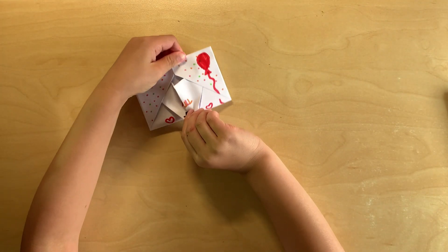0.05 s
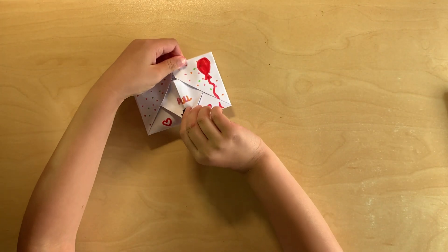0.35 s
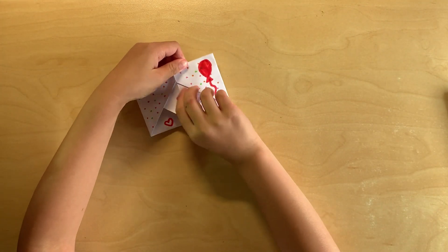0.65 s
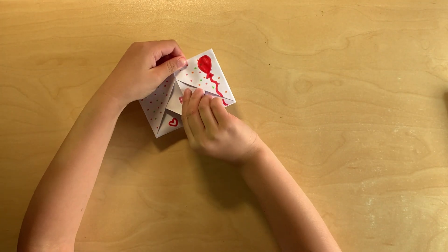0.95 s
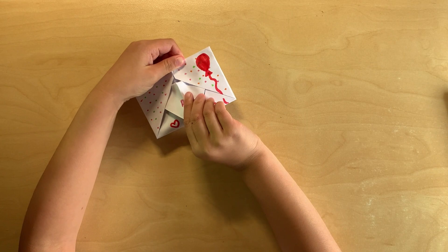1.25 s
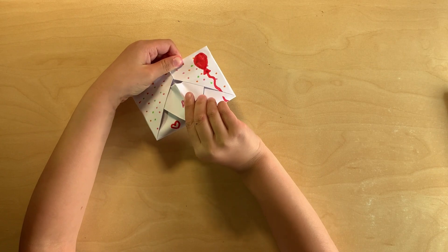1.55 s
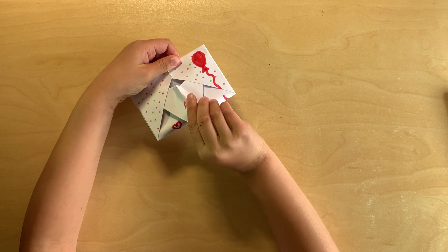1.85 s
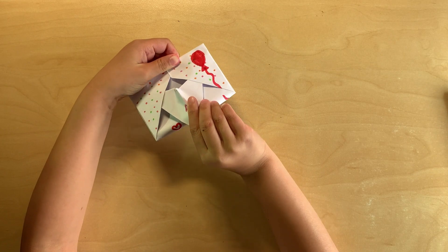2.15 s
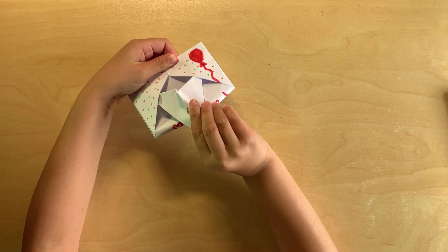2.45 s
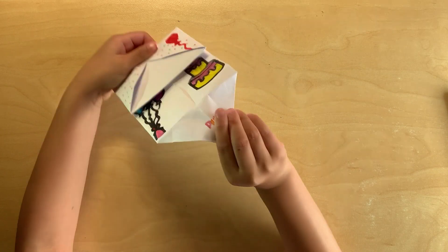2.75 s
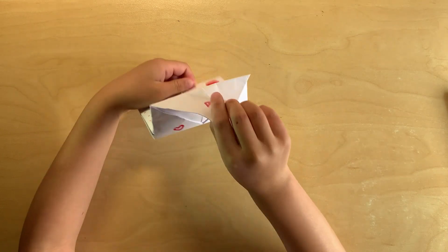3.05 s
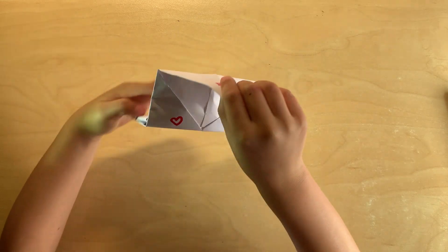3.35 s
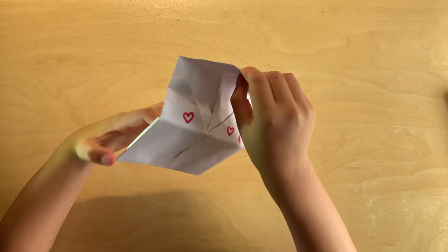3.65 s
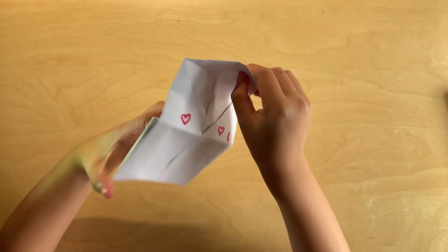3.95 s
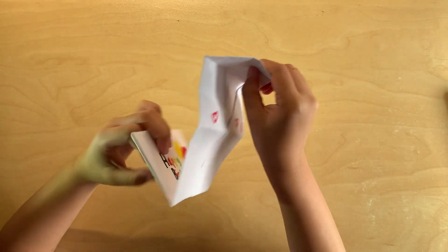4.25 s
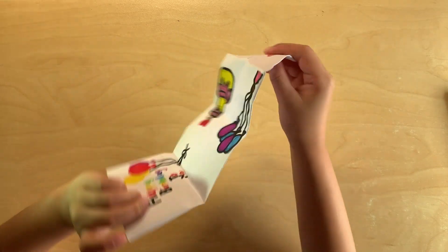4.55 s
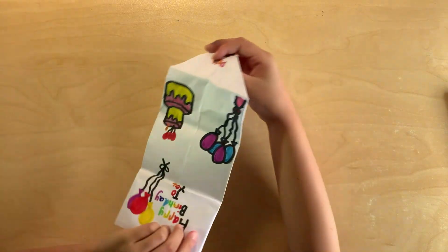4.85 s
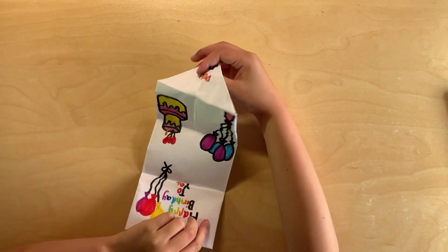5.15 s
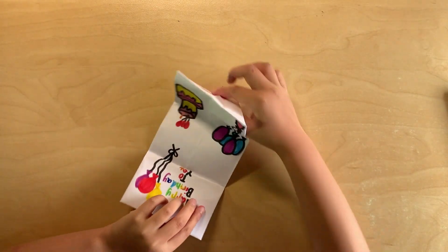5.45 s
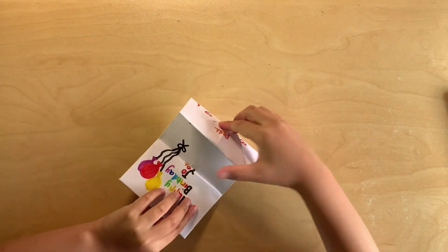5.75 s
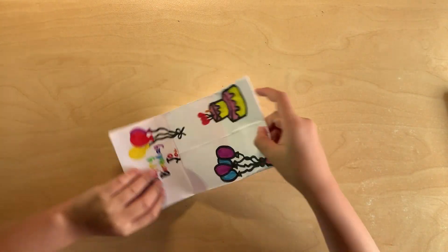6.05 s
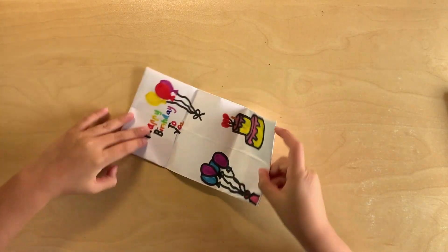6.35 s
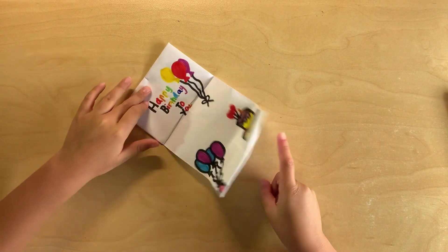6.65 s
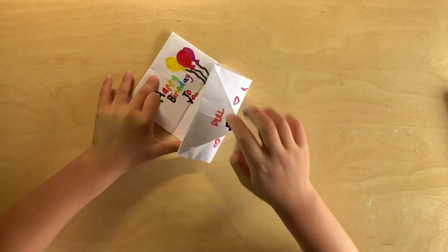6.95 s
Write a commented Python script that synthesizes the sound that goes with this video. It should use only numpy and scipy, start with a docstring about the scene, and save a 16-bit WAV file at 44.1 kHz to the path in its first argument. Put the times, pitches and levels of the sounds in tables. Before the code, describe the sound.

A folded paper card is handled over a wooden table in a small quiet room, heard in stereo. From the start, short pulls make dry scrapes of paper on paper, with crisp crease snaps, the sharpest around 1.3 and 1.7 seconds. The rubbing builds until, at about 2.7 seconds, the fold pops open with a crack and a low thump, the loudest moment. From 3 to 4.8 seconds the card is lifted and shaken out, giving quieter rustles, scattered ticks, soft low bumps and a barely audible hollow tone. From about 4.9 seconds it is laid down, dragged across the table and folded back, with clearer snaps near 5.6 and 6.2 seconds and a soft bump around 6.6. The rustling thins out just after 7 seconds. Faint room rumble and hiss lie underneath, with a weak drone that fades after about 2 seconds.

```python
"""Two hands draw a folded paper card open over a wooden table, in a small quiet room with a fading drone.
Paper slides on paper in tiny slips while creases snap and ring their panels. Near 2.7 s the whole fold
pops open with a thump. The card is lifted, with a faint hollow tone, and shaken out; from about 4.9 s it
is laid down, dragged over the table and folded back. Two closely spaced microphone ports hear it all."""
import sys
import numpy as np
from scipy import signal
from scipy.fft import rfft, irfft, next_fast_len
from scipy.io import wavfile
from scipy.ndimage import uniform_filter1d

SR = 44100
rng = np.random.default_rng(int(sys.argv[2]) if len(sys.argv) > 2 else 0)


def transcribe(signal):
    """Save signal, clipped to [-1, 1], as a 16-bit WAV file at the path in sys.argv[1]."""
    frames = np.atleast_2d(signal).T
    limited = np.clip(frames, -1, 1)
    pcm = np.round(limited * 32767).astype(np.int16)
    wavfile.write(sys.argv[1], SR, pcm)


N = 317961
TIME = np.arange(N) / SR

# The bright colour of a cracking crease. Each row: frequency in Hz, gain in dB.
CRACK_COLOUR = [(2500, -30.5), (5000, -18.5), (7000, 0.5), (9000, 5), (12000, -1), (15500, -4)]


def undb(db):
    """Decibels to gain."""
    return 10 ** (np.asarray(db) / 20)


def unit(x):
    """Scale to an rms of one."""
    return x / np.sqrt(np.mean(x ** 2))


def gains(points, hz):
    """Gain of a (Hz, dB) colour at the given frequencies."""
    point_hz, db = np.transpose(points)
    return undb(np.interp(np.log(hz + 1), np.log(point_hz), db))


def colour(x, points):
    """Causal EQ with a (Hz, dB) colour, built from the cepstrum."""
    size = 2 * next_fast_len(x.shape[-1] // 2 + 2048)
    cepstrum = irfft(np.log(gains(points, np.fft.rfftfreq(size, 1 / SR))))
    cepstrum[1:size // 2] *= 2
    cepstrum[size // 2 + 1:] = 0
    return irfft(rfft(x, size) * np.exp(rfft(cepstrum)))[..., :x.shape[-1]]


def bell(hz, octaves):
    """Colour of one resonance whose energy is centred on hz."""
    offset = np.linspace(-5, 5, 41)
    db = np.maximum(-2.2 * (offset / octaves) ** 2 - 3 * offset, -50)
    return np.column_stack([hz * 2 ** offset, db])


def add(out, start, sound):
    """Mix a sound in at a start time in seconds."""
    i = int(start * SR)
    out[i:i + len(sound)] += sound[:N - i]


def drift(rate):
    """Random wander with an rms of one, turning rate times a second."""
    span = int(SR / rate)
    steps = np.repeat(rng.standard_normal(N // span + 1), span)
    return unit(uniform_filter1d(steps, span)[:N])


def room_tone(air_db=-72.5, drone_db=-76.5):
    """A nearly centred rumble under a wide hiss, and a faint drone that sags and fades out."""
    # The colour of the quiet room. Each row: frequency in Hz, gain in dB.
    air_colour = [(20, -16), (40, 15.5), (62, 15.5), (120, 12.5), (180, 6), (300, 1), (600, -4),
                  (1100, -10), (2400, -13.5), (5000, -9), (9000, -27), (15000, -17.5)]
    mid, side = colour(rng.standard_normal((2, N)), air_colour)
    side = colour(side, [(150, -11), (600, -5), (2000, 0)])
    air = (mid + side * np.array([[1], [-1]])) / np.std(mid) * undb(air_db)
    drone_colour = [(150, -31), (330, -8), (370, 2.5), (410, -14), (800, -47)]
    drone = unit(colour(rng.standard_normal(N), drone_colour))
    fade_db = 2.5 * TIME + 36 * np.maximum(TIME - 1.7, 0)
    return air + drone * undb(drone_db - fade_db)


def rubbing(t, rise_db=16.5, sag_db_per_s=13.5, release_db_per_s=323, hiss_release_db_per_s=209.5):
    """The hands' strokes summed at times t: level in dB, rasp centre in Hz, relative body and hiss dB."""
    # Strokes of paper over paper: short pulls on the tab, the fold giving way at 2.6 s, lifting and
    # shaking from 3 s, dragging and folding from 4.9 s. Each row: start, attack and hold in seconds,
    # level in dB, rasp centre in Hz, panel body and fibre hiss in dB relative to the level.
    strokes = [ (0, 0.001, 0.012, -44, 3620, -17.5, 7.5), (0.058, 0.025, 0.0073, -50, 2500, -9.5, -1.5),
               (0.302, .016, 0.013, -44.5, 3340, -24, 0), (0.331, 0.022, .045, -48, 2220, -25, -2.5),
               (0.421, 0.049, 0.19, -60, 2730, -14, -8.5), (0.834, 0.0056, 0.012, -62.5, 2000, -2, -18),
               (0.903, 0.02, 0.17, -64.5, 2120, -11, -13), (1.026, .1, .015, -52.5, 2400, -18, -6),
               (1.204, 0.094, 0.022, -52, 2630, -12.5, -8.5), (1.338, 0.03, 0.052, -54, 3280, -11, -4),
               (1.427, .01, 0.058, -65.5, 3230, -21, 1.5), (1.655, 0.026, 0.035, -53, 4400, -17, 0),
               (1.768, 0.027, 0.021, -48.5, 2530, -7.5, -10), (1.847, 0.024, .21, -58, 2250, -3.5, -18),
               (2.124, 0.004, 0.025, -55, 2540, -4.5, -11), (2.222, 0.0045, 0.031, -52, 2340, -6, -4.5),
               (2.323, 0.0078, 0.035, -48, 2560, -8, -2), (2.418, 0.006, .025, -51, 2900, -7.5, 0.5),
               (2.439, .032, 0.044, -46, 2630, -12, -4), (2.588, 0.018, .035, -47, 2550, -17, -10),
               (2.619, 0.043, 0.019, -40.5, 3180, -12.5, 1), (2.66, 0.0061, 0.0053, -28.5, 3060, -6, -4),
               (2.688, 0.0092, 0.074, -46, 2300, -4, -7.5), (3.029, 0.021, 0.013, -71.5, 3240, -15, -2),
               (3.215, 0.12, .015, -69, 5000, -23.5, 1.5), (3.516, 0.019, 0.093, -72, 5000, -16, 10.5),
               (3.758, 0.0074, .015, -56.5, 4100, -17, -3.5), (3.782, 0.017, 0.022, -53, 3480, -10.5, -4),
               (3.938, 0.014, 0.015, -63.5, 4400, -4, 2), (3.986, .025, .008, -56, 3470, -17, -12),
               (4.063, .012, .008, -65.5, 2600, -4, -5.5), (4.163, .007, 0.012, -57.5, 2120, -4.5, -15),
               (4.187, .025, 0.055, -67.5, 2690, 2, 0), (4.24, 0.025, .005, -66.5, 4230, -1, 5),
               (4.281, 0.036, 0.019, -72, 3940, -5.5, 8.5), (4.408, 0.071, 0.047, -65.5, 3610, -8, 0.5),
               (4.59, .008, .004, -84, 3540, -3, 11.5), (4.67, 0.013, 0.018, -59, 1730, -4, -27),
               (4.87, 0.018, .016, -59.5, 2630, 2.5, 1.5), (4.923, 0.019, .13, -68, 1420, -3, -14.5),
               (5.119, 0.034, 0.096, -65.5, 2105, -5, -8), (5.257, 0.019, 0.065, -55.5, 2120, -7, -7.5),
               (5.37, 0.13, 0.049, -56, 3320, -11.5, 0.5), (5.578, 0.015, 0.018, -53.5, 2210, -10.5, -17),
               (5.805, 0.014, .025, -60.5, 3830, -13.5, 5), (5.838, 0.067, 0.18, -68, 2500, -1.5, -1),
               (5.943, 0.012, 0.0093, -59, 4420, -24, 9), (6.11, 0.014, 0.058, -64, 2500, -8, -7),
               (6.19, 0.018, 0.011, -45.5, 2840, -12.5, -1.5), (6.263, 0.04, 0.0079, -49, 4370, -20, 6.5),
               (6.309, 0.0083, 0.029, -47.5, 2900, -10, 0.5), (6.368, .02, 0.13, -60, 3400, -22, -1),
               (6.51, 0.031, 0.065, -53.5, 3900, -18, 0), (6.755, 0.023, 0.064, -56, 3200, -10.5, -0.5),
               (6.847, 0.045, 0.17, -66, 3400, -20, -6.5), (7.143, 0.059, .01, -67.5, 3600, -19, -4)]
    # The fingers never hold the paper quite still.
    grip_db, grip_hz, grip_body_db, grip_hiss_db = -88, 2760, -6, 1.5
    start, attack, hold, db, hz, body_db, hiss_db = np.transpose(strokes)[:, :, None]
    age = t - start
    rise = np.minimum(age / attack - 1, 0)
    past_peak = np.maximum(age - attack, 0)
    released = np.maximum(age - attack - hold, 0)
    envelope_db = -rise_db * rise ** 2 - sag_db_per_s * past_peak - release_db_per_s * released
    power = undb(np.maximum(db + envelope_db, -200)) ** 2
    grip = undb(grip_db) ** 2
    total = power.sum(axis=0) + grip
    blend = lambda value, at_rest: ((power * value).sum(axis=0) + grip * at_rest) / total
    hiss_power = undb(hiss_db - hiss_release_db_per_s * released) ** 2  # stops sooner than the rasp
    body_share = blend(undb(body_db) ** 2, undb(grip_body_db) ** 2)
    hiss_share = blend(hiss_power, undb(grip_hiss_db) ** 2)
    return 10 * np.log10(total), blend(hz, grip_hz), 10 * np.log10(body_share), 10 * np.log10(hiss_share)


def slips(per_second, spread_db, smooth):
    """Fibres catch and let go: dense clicks of uneven size over a smooth rub."""
    size = undb(spread_db * np.minimum(rng.exponential(size=N), 3.5))
    clicks = (rng.random(N) < per_second / SR) * size * rng.standard_normal(N)
    return unit(unit(clicks) + smooth * rng.standard_normal(N))


def sliding(body_trim_db=-1, rasp_trim_db=-1, flutter_db=1.5, rasp_octaves=0.76, bend_db=3.0):
    """Slips shake the panels, rasp in the sheet and hiss at its surface; bands waver as it bends."""
    # The colours of the rubbed panels and of the surface hiss. Each row: frequency in Hz, gain in dB.
    body_colour = [(120, -30), (300, -12.5), (500, -5), (800, 2.5), (1100, 3.5), (1500, -10), (2400, -35.5)]
    hiss_colour = [(4500, -82.5), (6300, -3.5), (7500, 11.5), (9000, -6.5), (12000, 5), (15500, -2)]
    step, size = 32, next_fast_len(N)
    level_db, centre_hz, body_db, hiss_db = rubbing(TIME[::step])
    friction = slips(per_second=5000, spread_db=-0.5, smooth=0.76) * undb(flutter_db * drift(90))
    spectrum = rfft(friction, size)
    hz = np.fft.rfftfreq(size, 1 / SR)
    bands = 160 * 2 ** (np.arange(21)[:, None] / 3)  # third octaves, in Hz
    share = lambda power: power / power.sum(axis=0)
    rasp = np.exp(-.5 * (np.log2(bands / centre_hz) / rasp_octaves) ** 2)
    rasp /= 1 + (1150 / bands) ** 8 + (bands / 7000) ** 8  # steep low and high cuts
    power = share(rasp) * undb(rasp_trim_db) ** 2
    for tone, db in ((body_colour, body_db + body_trim_db), (hiss_colour, hiss_db)):
        power += share(gains(tone, bands) ** 2 * bands) * undb(db) ** 2
    out = np.zeros(N)
    for band, band_power in zip(bands, power):
        window = np.clip(1 - 3 * np.abs(np.log2((hz + 1) / band)), 0, 1)
        band_noise = unit(irfft(spectrum * window, size)[:N])
        gain = np.sqrt(band_power) * undb(level_db + bend_db * drift(11)[::step])
        out += band_noise * np.interp(TIME, TIME[::step], gain)
    return out


def buckle(tone, click_s, ring_s, tail_db):
    """A sudden kick, then bending waves die away in the sheet; has the energy of 1 ms at full level."""
    t = TIME[:2048]
    kick = unit(np.exp(-t / click_s) * rng.standard_normal(len(t)))
    waves = unit(np.exp(-t / ring_s) * rng.standard_normal(len(t)))
    sound = unit(colour(kick, tone)) + undb(tail_db) * unit(colour(waves, tone))
    return sound * np.sqrt(SR / 1000 / np.sum(sound ** 2))


def snapping(ring_trim_db=1, crack_trim_db=1.5, thud_trim_db=-2):
    """Each snap rings a panel at its own pitch; the crease adds a crack, the fold a hollow thud."""
    # Creases snapping and panels buckling. Each row: start in seconds, ring level in dB, panel pitch
    # in Hz, ring width in octaves, crack level in dB, thud level in dB (levels before the trims).
    snaps = [(0.379, -36, 2330, 1.18, -38, -48), (0.5302, -41.5, 4150, 0.97, -50, -75),
             (0.583, -44, 2420, 1.5, -63, -63), (0.6997, -50, 4480, 1.8, -54, -67),
             (0.8445, -41.5, 990, 0.43, -63, -45), (0.9227, -54, 1070, 1.5, -75, -46.5),
             (1.0462, -41.5, 1950, .7, -71, -61), (1.1245, -36, 2000, 0.47, -44.5, -69),
             (1.2963, -24.5, 3550, 0.63, -27.5, -50), (1.3638, -34, 4130, .6, -29, -64),
             (1.3796, -30.5, 3220, 0.64, -34.5, -63), (1.4355, -40, 3910, 1.15, -35.5, -62),
             (1.4717, -50, 4810, .4, -42, -71), (1.6715, -22.5, 5060, 0.59, -21, -80),
             (1.826, -28, 1680, 0.79, -66, -53), (2.127, -47.5, 2600, 0.84, -48, -60),
             (2.2217, -39, 2180, 0.78, -41, -61), (2.322, -36.5, 2100, 0.68, -52, -75),
             (2.5962, -36.5, 2730, 0.8, -47, -68), (2.6689, -16, 2900, 1.77, -35, -25.5),
             (2.6717, -20, 3900, 0.35, -20, -36), (2.6765, -19, 1900, 1.3, -22, -37),
             (2.7312, -29, 1750, 1.5, -26.5, -46), (2.7683, -37, 1600, 0.21, -56, -53),
             (2.792, -32, 1790, 0.57, -69, -55), (2.8802, -43.5, 1290, 0.45, -80, -51),
             (3.431, -53, 1450, 0.43, -66, -56), (3.8281, -44, 1640, 0.82, -74, -40.5),
             (3.8646, -46, 1880, 0.36, -79, -51), (4.0081, -39.5, 2210, 4.8, -43.5, -40.5),
             (4.1736, -43.5, 1640, 0.83, -63, -41.5), (4.254, -44, 2410, 5.4, -51, -56),
             (4.508, -43.5, 2195, 1.47, -50, -44), (4.5251, -47.5, 2010, 2, -66, -42.5),
             (4.6492, -61, 705, 1.5, -60, -41), (4.6783, -32, 796, 0.34, -80, -43.5),
             (4.696, -52, 1250, 0.87, -57, -61), (4.749, -51, 795, .3, -70, -42.5),
             (4.8831, -41.5, 2010, 1.4, -39.5, -56), (4.9948, -42.5, 1465, 0.32, -54.5, -61.5),
             (5.2958, -43, 1400, 0.21, -55, -68), (5.444, -45.5, 2430, 1.4, -59, -48.5),
             (5.5938, -28.5, 1930, 0.63, -59, -59.5), (5.924, -45.5, 1770, 0.86, -56, -59),
             (5.9927, -39, 1500, 0.49, -59, -48), (6.181, -29, 1520, 0.59, -35.5, -42.5),
             (6.215, -35, 2170, 1.54, -53, -58), (6.3185, -31, 3500, 0.25, -48, -54),
             (6.4466, -44, 2550, .25, -53, -72), (6.5465, -44, 2500, 0.16, -43, -56.5),
             (6.7773, -47, 1620, 1.4, -69, -63), (7.0818, -49.5, 1327, 0.47, -64, -66)]
    thud_colour = bell(hz=537, octaves=.55)
    out = np.zeros(N)
    for start, ring_db, hz, octaves, crack_db, thud_db in snaps:
        # A slack panel rings broadly and flutters on; a taut one gives a single narrow tick.
        slack_db = 4.5 * np.log2(octaves / 0.6)
        ring = buckle(bell(hz, octaves), click_s=0.00021, ring_s=0.0066, tail_db=slack_db)
        crack = buckle(CRACK_COLOUR, click_s=0.00068, ring_s=0.0028, tail_db=slack_db)
        thud = buckle(thud_colour, click_s=0.00008, ring_s=0.0065, tail_db=slack_db - 2)
        add(out, start, undb(ring_db + ring_trim_db) * ring)
        add(out, start, undb(crack_db + crack_trim_db) * crack)
        add(out, start, undb(thud_db + thud_trim_db) * thud)
    return out


def crinkling(count=90, over_db=5, crack_db=-7, spread_db=6, follow=0.92, pivot_db=-60):
    """Tiny buckles and cracks at random moments, stronger the harder the paper is rubbed."""
    out = np.zeros(N)
    starts = rng.random(count) * TIME[-1]
    level_db, centre_hz, _, _ = rubbing(starts)
    for start, db, hz, (size, detune) in zip(starts, level_db, centre_hz, rng.standard_normal((count, 2))):
        gain = undb(pivot_db + follow * (db - pivot_db) + over_db + spread_db * size)
        panel_colour = bell(hz * 2 ** (.55 * detune), octaves=.7)
        ring = buckle(panel_colour, click_s=0.00022, ring_s=0.005, tail_db=0.5)
        crack = buckle(CRACK_COLOUR, click_s=0.0005, ring_s=0.0035, tail_db=0.5)
        add(out, start, gain * (ring + undb(crack_db) * crack))
    return out


def thumping(trim_db=-1, rough=0.31, swell_cycles=1.15):
    """Sheet and hands push softly on air and table; each blow swells and dies in a few uneven cycles."""
    # The soft blows. Each row: start in seconds, peak level in dB before the trim, pitch in Hz.
    thumps = [(1.202, -57, 60), (2.671, -31.5, 208), (2.674, -33.5, 89.3), (2.704, -27, 117.8),
              (2.723, -36, 68.4), (2.744, -35, 123), (2.804, -45.5, 47), (2.909, -41.5, 101),
              (2.995, -53, 79.8), (3.433, -54, 125), (3.844, -49, 47.8), (3.898, -51, 51), (3.99, -50, 115),
              (4.044, -51, 70), (4.178, -53.5, 156), (4.313, -53.5, 73), (4.544, -56, 117),
              (6.233, -51.5, 117), (6.321, -53.5, 199), (6.632, -42, 109), (6.698, -54.5, 86),
              (6.78, -48, 144.6), (7.087, -55.5, 123)]
    out, t = np.zeros(N), TIME[:16384]
    for start, db, hz in thumps:
        swell_s = swell_cycles / hz
        envelope = t / swell_s * np.exp(1 - t / swell_s)
        rumble_colour = [(hz / 2, -6), (hz, 0), (2 * hz, -6), (10 * hz, -60)]
        rumble = unit(colour(rng.standard_normal(len(t)), rumble_colour))
        add(out, start, undb(db + trim_db) * envelope * (np.sin(2 * np.pi * hz * t) + rough * rumble))
    return out


def hollow_tone(width_hz=70):
    """A narrow, unsteady resonance swells and fades while the card is lifted."""
    # The faint swells. Each row: start in seconds, length in seconds, level in dB, pitch in Hz.
    swells = [(2.976, 0.25, -75.5, 764), (3.46, 0.35, -77, 743)]
    out = np.zeros(N)
    for start, length, db, hz in swells:
        t = TIME[:int(length * SR)]
        resonance = signal.iirpeak(hz, hz / width_hz, fs=SR)
        narrow_noise = signal.lfilter(*resonance, rng.standard_normal(SR))
        ring = signal.lfilter(*resonance, narrow_noise)[:len(t)]
        add(out, start, undb(db) * unit(ring) * np.sin(np.pi * t / length))
    return out


def room(x, early_s=.006, t60_low=.33, t60_high=.22, trim_db=-3):
    """Direct sound at two ports, quick echoes from table and hands, then the short tail of the walls."""
    # Table and wall echoes. Each row: frequency in Hz, level in dB against the direct sound.
    table_echo = [(150, -16), (450, 2.5), (1200, -1), (3500, -5.5), (7000, 5), (13000, -33)]
    wall_echo = [(150, -8), (450, -2.5), (1200, -6.5), (3500, -7), (7000, -9), (13000, -34)]
    # How the right port trails the left. Each row: frequency in Hz, phase lag in radians.
    port_lag = [(0, 0), (200, -.1), (550, -.6), (1000, -.2), (2000, 0), (3100, -2.2), (4500, -1.9),
                (5300, -4.4), (6400, -6), (9300, -3.1), (22050, 8.4)]
    t, lead = TIME[:22050], 256
    hz = np.fft.rfftfreq(len(t), 1 / SR)
    table_gain, wall_gain = gains(table_echo, hz), gains(wall_echo, hz)
    low_fade, high_fade = np.exp(-np.log(1000) * t / np.array([[t60_low], [t60_high]]))
    near = rng.standard_normal((2, len(t))) * np.exp(-t / early_s) * (t > .001)
    far = rng.standard_normal((2, len(t))) * np.clip(t / 0.0021 - .5, 0, 1)
    spectrum = lambda h: rfft(h / np.sqrt(np.sum(h ** 2, axis=-1, keepdims=True)))
    treble = hz / (hz + 3000)
    tail = spectrum(far * low_fade) * (1 - treble) + spectrum(far * high_fade) * treble
    echoes = spectrum(near) * table_gain + tail * wall_gain
    alike = .85 / (1 + (hz / 600) ** 2)  # long waves reach both ports alike
    echoes[1] = alike * echoes[0] + np.sqrt(1 - alike ** 2) * echoes[1]
    lag = np.interp(hz, *np.transpose(port_lag))
    direct = np.exp(-1j * np.outer([0, 1], lag))
    paths = direct + echoes
    # The many paths leave fine ripples but no broad colour of their own.
    broad_power = uniform_filter1d(np.mean(np.abs(paths) ** 2, axis=0), size=150)
    paths *= np.sqrt((1 + table_gain ** 2 + wall_gain ** 2) / broad_power)
    taper = np.minimum(4 * (1 - t / t[-1]), 1) ** 2
    response = np.roll(irfft(paths), lead, axis=1) * taper * undb(trim_db)
    return signal.fftconvolve(x[None], response, axes=1)[:, lead:lead + N]


def moving(x, places=7):
    """The card crossfades through places above the table, each with its own pattern of echoes."""
    position = TIME / TIME[-1] * (places - 1)
    fades = (np.cos(np.pi / 2 * np.clip(position - k, -1, 1)) ** 2 for k in range(places))
    return sum(room(x * fade) for fade in fades)


def scene():
    """The card moving in its room, with the hollow tone and the room tone laid under it."""
    card = sliding() + snapping() + crinkling() + thumping()
    return moving(card) + hollow_tone() + room_tone()


def record(dry):
    """Each microphone port colours the sound a little, and the top is cut steeply."""
    # The colour of each port. Each row: frequency in Hz, gain in dB.
    left_colour = [(100, .6), (600, -1.1), (2000, 0), (3900, 1.6), (6000, .4), (12000, 0)]
    right_colour = [(100, -.6), (600, .9), (2000, 0), (3900, -1.4), (6000, -.4), (12000, 0)]
    top_hz = 16150
    ports = np.array([colour(dry[0], left_colour), colour(dry[1], right_colour)])
    return signal.sosfilt(signal.ellip(10, .2, 70, top_hz, fs=SR, output="sos"), ports)


dry = scene()
out = record(dry)
transcribe(out)
```